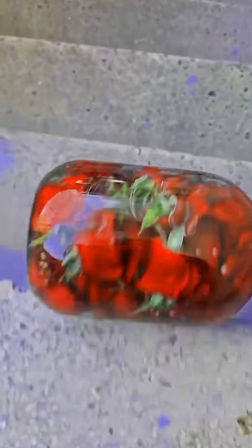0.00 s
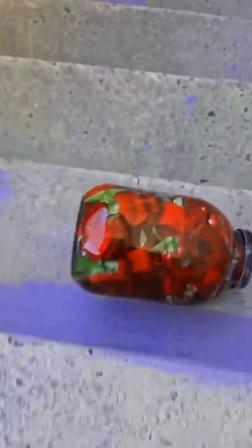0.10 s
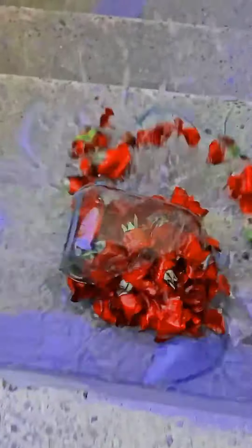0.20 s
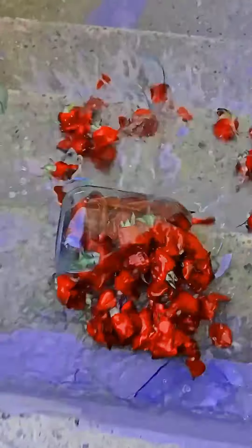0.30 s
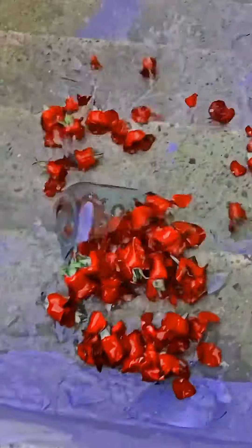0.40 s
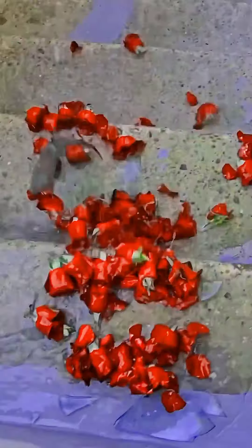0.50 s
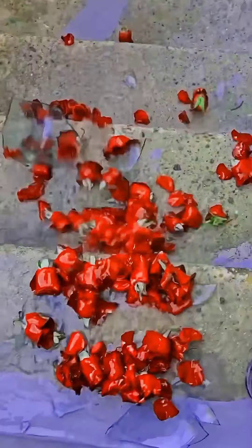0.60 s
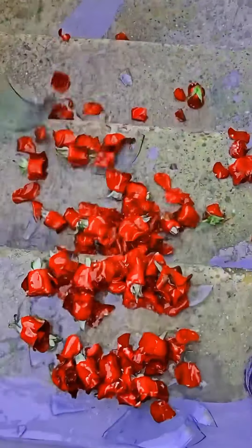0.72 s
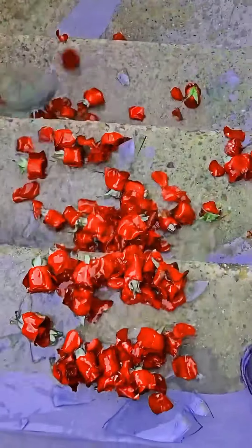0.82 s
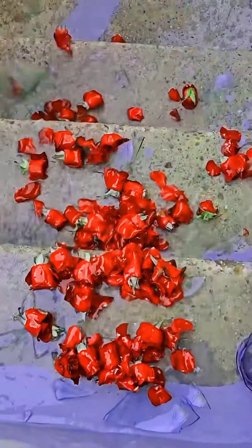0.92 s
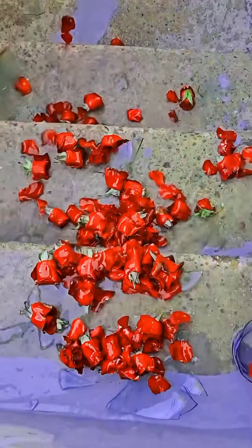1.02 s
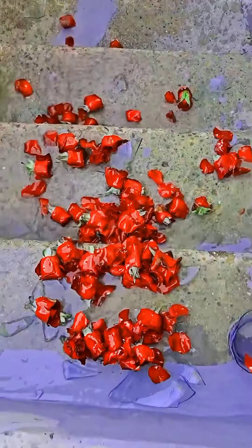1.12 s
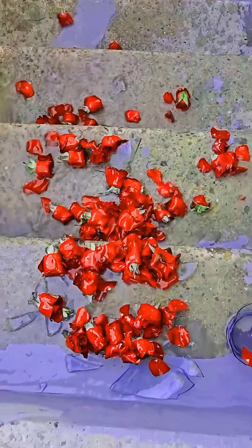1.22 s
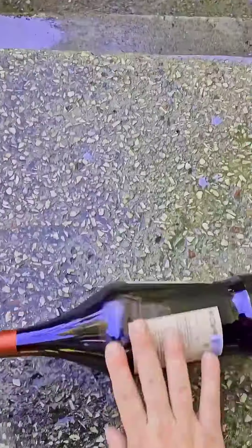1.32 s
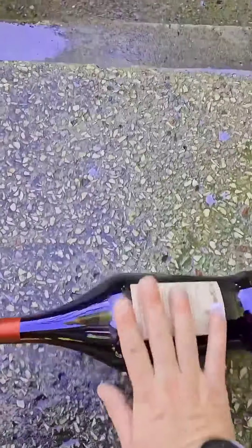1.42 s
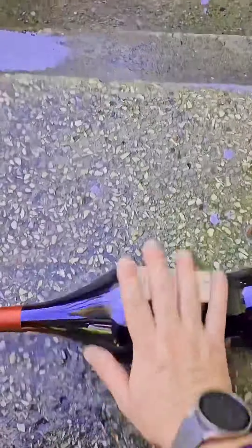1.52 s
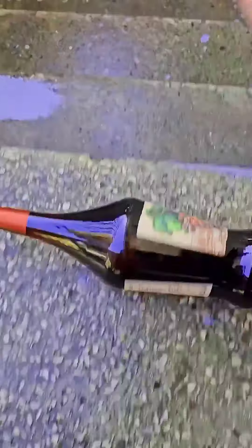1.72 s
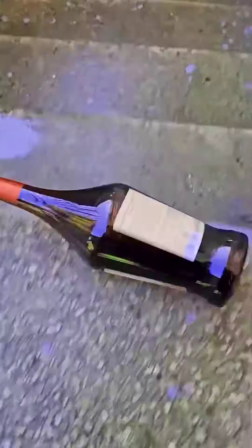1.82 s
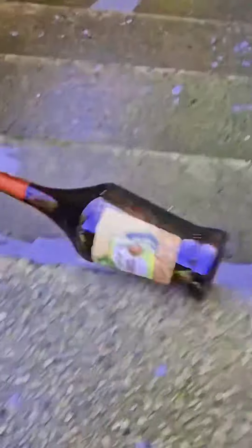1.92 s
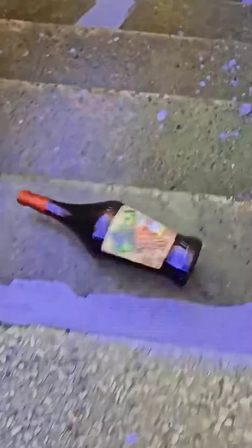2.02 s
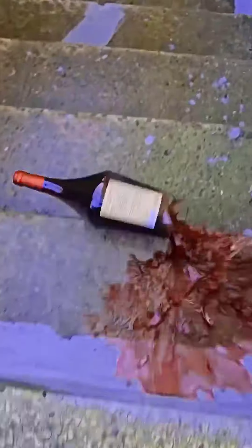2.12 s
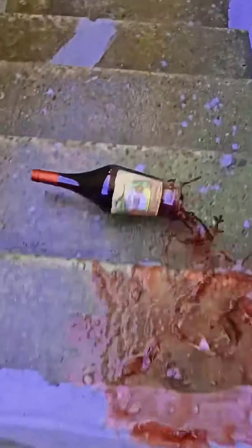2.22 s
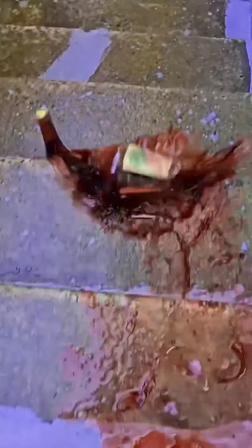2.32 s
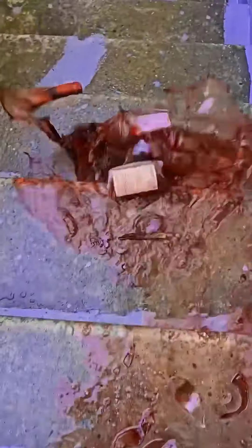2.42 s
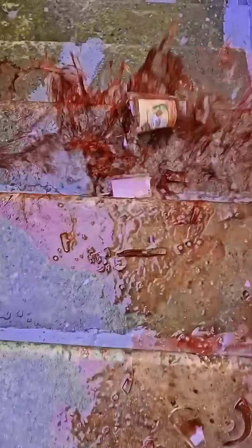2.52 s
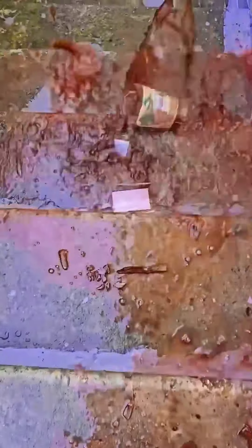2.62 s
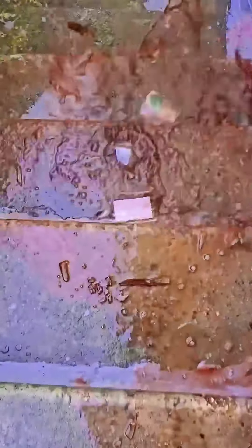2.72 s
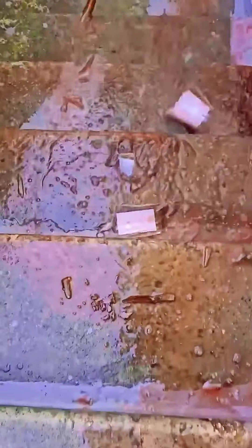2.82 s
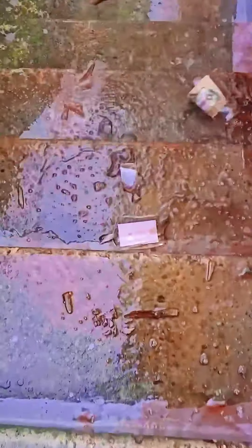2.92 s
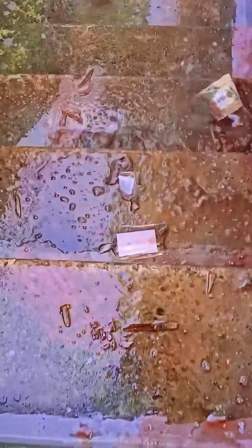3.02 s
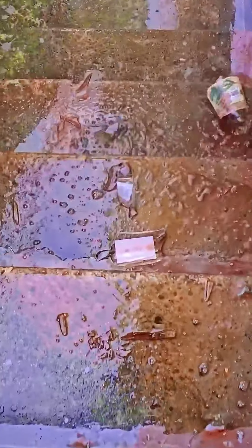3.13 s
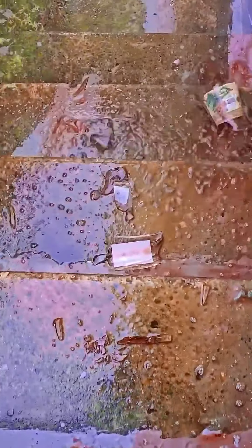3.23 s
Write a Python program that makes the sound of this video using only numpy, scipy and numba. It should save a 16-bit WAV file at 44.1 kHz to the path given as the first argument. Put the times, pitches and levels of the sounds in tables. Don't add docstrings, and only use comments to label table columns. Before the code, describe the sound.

Glass breaks on stone steps. After a brief dull scrape, a jar bursts at 0.2 s with a low thump; bright shards clink, ring and skitter until an abrupt cut at 1.37. A full bottle grinds and knocks rapidly, loudest 1.6-1.9, then smashes around 2.02-2.07. Wine sloshes, a deep blow lands at 2.3, and pieces clink, thinning past 3 s. Close outdoor stereo, short stone echoes, gusty wind rumble.

```python
import sys
import numpy as np
from scipy import signal
from scipy.io import wavfile
from scipy.ndimage import uniform_filter1d
from numba import njit

SR = 44100
rng = np.random.default_rng(int(sys.argv[2]) if len(sys.argv) > 2 else 0)


def master(y):
    cut = np.clip(np.atleast_2d(y).T, -1, 1)
    pcm = np.round(cut * 32767)
    wavfile.write(sys.argv[1], SR, pcm.astype(np.int16))


def volts_from_db(level):
    exponent = np.asarray(level, float) / 20
    return 10 ** exponent


N = 143325
CHANGE_S = 1.371
LAG_S = .00013
LIKENESS = 0.06


@njit
def add(out, at, hz, t60, size, rise, lag, pan):
    for e in range(len(at)):
        turn = np.exp((2j * np.pi * hz[e] - np.log(1000) / t60[e]) / SR)
        rise_step = np.exp(-1 / (rise * SR))
        for c in range(2):
            start = int(at[e] * SR) + int(lag[e] * SR) * c
            z = size[e] * (pan[e] if c == 0 else 1 / pan[e]) + 0j
            unrisen = 1.
            for i in range(start, min(out.shape[1], start + int(t60[e] * SR))):
                out[c, i] += z.imag * (1 - unrisen)
                z, unrisen = z * turn, unrisen * rise_step


def rings(at, db, hz, t60, rise):
    out = np.zeros((2, N))
    place = rng.standard_normal((len(at), 2))
    lag = np.abs(LAG_S * (0.54 + .9 * place[:, 0]))
    pan = volts_from_db(2.0 * place[:, 1])
    add(out, 1. * at, np.minimum(hz, .45 * SR), np.clip(t60, .003, .6), volts_from_db(db), rise, lag, pan)
    return out


def band(x, lo_hz, hi_hz):
    return signal.sosfilt(signal.butter(2, [lo_hz, hi_hz], "band", fs=SR, output="sos"), x)


def unit(x):
    return x / np.sqrt(np.mean(x ** 2))


def walk(rate):
    k = int(SR / rate)
    held = np.repeat(rng.standard_normal(N // k + 1), k)
    return unit(uniform_filter1d(uniform_filter1d(held, k), k)[:N])


def pair(like, grain):
    a, b = rng.standard_normal((2, N)) * grain
    like = np.clip(like, 0, 1)
    right = like * a + np.sqrt(1 - like ** 2) * b
    return np.array([a, np.roll(right, int(LAG_S * SR))])


def curve(table):
    s, db = np.array(table).T
    return volts_from_db(np.interp(np.arange(N) / SR, s, db))


def crashes(table, attack_s, top_db, crack_db, low_hz):
    level_db, crack_s, tail_db, tail_stretch = -5.5, 0.00043, -14.5, 2.88
    power = np.zeros((3, N))
    for s, db, low_db, t60 in table:
        i = int(s * SR)
        t = np.arange(min(N - i, SR // 2)) / SR
        t60 = max(t60, .005)
        fall = 1000. ** (-t / t60)
        crack = volts_from_db(crack_db) * np.exp(-t / crack_s)
        tail = volts_from_db(tail_db) * 1000. ** (-t / t60 / tail_stretch)
        shape = (1 - np.exp(-t / attack_s)) * (fall + crack + tail)
        gain = volts_from_db(db + level_db + np.array([low_db, 0, top_db]))
        power[:, i:i + len(t)] += (gain[:, None] * shape) ** 2
    grain = volts_from_db(1.5 * walk(600))
    out = 0
    for p, lo_hz, hi_hz, like in zip(power, (low_hz, 1600, 6500), (1800, 7000, 16500), (.8, LIKENESS, LIKENESS)):
        out = out + np.sqrt(p) * unit(band(pair(like, grain), lo_hz, hi_hz))
    return out


def shards(table, partner_db, rise):
    s, db, hz, *t60 = np.array(table).T
    t60 = t60[0] if t60 else 0.079 + 0 * s
    c = rng.random((len(s), 2))
    main = rings(s, db, hz, t60, rise)
    beat = rings(s, db - 8, hz * (1 + 0.01 * (c[:, 0] + 0.35)), 0.81 * t60, rise)
    brief = rings(s, db + partner_db, hz * (1.25 + 1.2 * c[:, 0]), 0.2 * t60, rise)
    lasting = rings(s, db + partner_db, hz * (1.2 + 0.75 * c[:, 1]), 1.37 * t60, rise)
    return main + beat + brief + lasting


def debris(table, lo_hz, level_db):
    s, db = np.repeat(np.array(table)[:, :2], 16, axis=0).T
    c = rng.random((len(s), 4))
    piece_db = db + level_db + 5 * c[:, 1] - 3.6 * c[:, 2]
    return rings(s + .04 * c[:, 0] ** 2, piece_db, lo_hz * 8.3 ** c[:, 2], 0.0048 + 0.067 * c[:, 3], 0.00017)


def stone_steps(x):
    t = np.arange(SR // 20) / SR
    echo_t60_s, echo_db, chatter_db = 0.033, -8.5, 3
    echo = rng.standard_normal((2, len(t))) * 1000. ** (-t / echo_t60_s) * (t > .001)
    echo = echo / np.sqrt(np.sum(echo ** 2, axis=1, keepdims=True))
    echo = volts_from_db(echo_db) * band(echo, 1120, 12600)
    x = x * volts_from_db(chatter_db * walk(330))
    return x + signal.fftconvolve(x, echo, axes=1)[:, :N]


# (time [s], peak level [dB], low band relative level [dB], t60 [s])
JAR_CRASHES = [(.05, -25.5, 3, 0.065), (.2165, -5, -5.5, 0.15), (.239, -24, 15.5, 0.057),
               (.307, -15, 1, 0.026), (.349, -13, 3, 0.06), (.372, -26, 1.5, 0.47), (.478, -8, -14, 0.071),
               (.534, -11.5, -3, 0.13), (.593, -11, -6, 0.081), (.692, -28, -27, 0.38),
               (.747, -14.5, -13, 0.065), (.835, -19.5, -13, 0.18), (.958, -14.5, 1, 0.21),
               (1.129, -26, -4.5, 0.42), (1.178, -19.5, -0.5, 0.15)]
# (time [s], peak level [dB], pitch [Hz], t60 [s])
JAR_BODY_MODES = [(.243, -5, 1958, 0.048), (.305, -27, 1310, 0.11), (.44, -16, 1974, 0.036),
                  (.479, -18.5, 2350, .15), (.575, -34, 2005, 0.6), (.594, -4, 3170, .025),
                  (.603, -21, 506, 0.085), (.615, -20.5, 3760, 0.18), (.665, -37, 579, 0.29),
                  (.695, -16.5, 4990, 0.11), (.733, -35, 583, 0.17), (.84, -41, 1040, 0.19),
                  (.85, -34.5, 2240, 0.3), (.87, -32, 2460, 0.26), (.876, -27.5, 500, 0.095),
                  (.9, -24, 392, 0.082), (.965, -31, 1148, 0.24), (.975, -26, 1550, .08),
                  (1.075, -22, 3220, 0.017), (1.09, -25, 5780, .12), (1.131, -28.5, 1153, 0.18),
                  (1.16, -37.5, 307.5, 0.39), (1.255, -39, 608, 0.21), (1.27, -37, 2434, 0.29),
                  (1.36, -16.5, 4500, 0.094)]
# (time [s], peak level [dB], pitch [Hz])
JAR_SHARDS = [(0.3062, -14, 3110), (0.3506, -41, 3950), (0.374, -8, 3240), (0.4774, -5, 4590),
              (0.594, -8.5, 4210), (0.6454, -10.5, 4220), (0.82, -10, 4300), (0.9642, -13, 4770),
              (1.1292, -14, 2590), (1.281, -14, 4380),
              (.3207, -22, 7560), (0.347, -13.5, 9000), (0.4346, -10.5, 7730), (0.557, -12, 7000),
                 (0.5937, -8, 9280), (.617, -16.5, 9770), (0.692, -5, 8130), (.749, -15, 10130),
                 (0.834, -5, 11480), (0.875, -16, 6100), (0.906, -12, 7730), (1.19, -16.5, 7970),
                 (1.2156, -21, 11500), (1.25, -14.5, 8500), (1.2825, -24, 8140)]
# (time [s], peak level [dB], pitch [Hz])
FINAL_CLINK = [
    (1.3605, -11, 9410),
    (1.3605, -15, 8100),
    (1.3605, -15, 14700),
]


def jar():
    burst = crashes(JAR_CRASHES, 0.0059, -11.0, 7, 94)
    pieces = debris(JAR_CRASHES, 2600, -14)
    pieces = pieces + shards(JAR_BODY_MODES, -6.5, 0.007)
    pieces = pieces + shards(JAR_SHARDS, -6.5, .008)
    pieces = pieces + shards(FINAL_CLINK, -8, 0.0022)
    cut = np.clip((CHANGE_S - np.arange(N) / SR) / .002, 0, 1)
    return (burst + stone_steps(pieces)) * cut


# (time [s], peak level [dB], low band relative level [dB], t60 [s])
BOTTLE_CRASHES = [(1.552, -31.5, 3, 0.092), (1.751, -17, -15, 0.057), (1.932, -35, 18.5, 0.041),
                  (2.022, -15, 0, 0.079), (2.064, -9, -4.5, 0.07), (2.134, -14.5, 3, 0.027),
                  (2.272, -13.5, 1, 0.12), (2.37, -29, 1, 0.094), (2.471, -12.5, 0, 0.14),
                  (2.517, -21, -10, 0.051), (2.572, -22, -2.5, 0.19), (2.588, -12, -12.5, 0.087),
                  (2.606, -13, -15, 0.059), (2.778, -18.5, -5, 0.21), (2.828, -22, -10, 0.21),
                  (2.976, -22.5, -15, 0.13), (3.119, -26.5, 1, 0.11)]
# (time [s], peak level [dB], pitch [Hz], t60 [s])
BOTTLE_MODES = [(.535, -6, 584, 0.026), (1.553, -29.5, 2870, 0.15), (1.613, -23.5, 1460, 0.37),
                (1.638, -18, 1437, 0.35), (1.933, -21.5, 1635, 0.06), (1.934, -32.5, 4760, 0.036),
                (2.022, -13, 2632, 0.1), (2.023, -17, 1500, 0.09), (2.783, -21, 3900, .09),
                (2.786, -24, 5750, .1), (2.226, -13, 7640, 0.021), (2.23, -13.5, 1780, 0.0088),
                (2.518, -20.5, 5800, 0.091), (2.607, -19, 7190, 0.12), (1.95, -31, 562, 0.19),
                (2.115, -27, 7870, 0.13), (2.204, -36, 2950, 0.016), (2.375, -42, 6170, .1),
                (2.888, -31, 4390, 0.26), (2.977, -19.5, 3910, 0.17), (2.977, -18.5, 5670, 0.1),
                (3.125, -37.5, 3830, 0.18)]


def bottle():
    burst = crashes(BOTTLE_CRASHES, 0.00079, -6, 6.5, 406)
    pieces = debris(BOTTLE_CRASHES, 1100, -21) + shards(BOTTLE_MODES, -21, 0.00058)
    return burst + stone_steps(pieces)


def knock(hz, t):
    width_s = 0.00055 / (hz / 1000) ** 0.63
    wave = np.cos(2 * np.pi * hz * t) + volts_from_db(-27.0) * np.cos(2 * np.pi * 2900 * t)
    return -wave * np.exp(-(t / width_s) ** 2)


# (time [s], peak level [dB], pitch [Hz])
ROLL_KNOCKS = [(1.574, -19.5, 842), (1.612, -7.5, 1550), (1.626, -20.5, 800), (1.637, -5.5, 1560),
               (1.648, -18.5, 800), (1.659, -27, 800), (1.675, -24, 800), (1.6865, -16.5, 900),
               (1.702, -10, 870), (1.714, -26, 900), (1.727, -8, 820), (1.731, -26, 900),
               (1.7505, -40, 800), (1.757, -28, 735), (1.776, -7.5, 900), (1.786, -32, 1100),
               (1.8017, -15, 1100), (1.819, -10, 1250), (1.8241, -6, 960), (1.851, -15, 1100),
               (1.861, -1.5, 1500), (1.8725, -14.5, 870), (1.883, -33, 1500), (1.895, -18, 1500),
               (2.0207, -3, 1330), (2.064, -11.5, 1160), (2.272, -11.5, 1300), (2.571, -13, 1310)]
# (time [s], level [dB])
ROLL_LEVEL = [
    (1.37, -46),
    (1.4, -38.5),
    (1.55, -33),
    (1.65, -25),
    (1.88, -26.5),
    (1.97, -48),
]


def rolling():
    bumps_per_s, rattle_db = 95, -8.5
    half = 150
    t = np.arange(-half, half) / SR
    out, bumps = np.zeros((2, N)), np.zeros(N)
    for s, db, hz in ROLL_KNOCKS:
        i = int(s * SR) + 60
        out[:, i - half:i + half] += volts_from_db(db + 4) * knock(hz, t - np.array([[0], [LAG_S]]))
    c = rng.standard_normal((int(bumps_per_s * N / SR) - 9, 2))
    bump_s = (np.arange(len(c)) + 4 + .2 * c[:, 0]) / bumps_per_s
    bumps[(bump_s * SR).astype(int)] = volts_from_db(3.5 * c[:, 1])
    rattle = unit(np.convolve(bumps, knock(810, t), "same"))
    rattle = np.array([rattle, np.roll(rattle, int(LAG_S * SR))])
    drive = volts_from_db(rattle_db) * bumps + np.abs(np.roll(out[0], 40)) * 0.12
    grit = signal.lfilter([1], [1, -np.exp(-1 / (0.0055 * SR))], drive) + 0.079
    glass = 0
    for hz, db in ((900, -13.0), (1450, -11.0), (2150, -19), (2900, -12), (5200, -21.5), (7500, -28.5),
                   (12500, -31)):
        glass = glass + volts_from_db(db) * unit(band(pair(0.4, grit), hz / 1.175, hz * 1.105))
    return out + curve(ROLL_LEVEL) * (volts_from_db(rattle_db) * rattle + glass)


# (time [s], level [dB])
SKITTER_LEVEL = [(.183, -58), (.21, -26), (.5, -29), (.9, -30.5), (1.368, -33), (1.372, -52), (2.0, -50.5),
                 (2.04, -28.5), (2.44, -40.5), (2.5, -27.5), (2.74, -37), (2.8, -26.5), (3.0, -42),
                 (3.25, -46.5)]


def skitter():
    splinters_per_s, splinter_t60_s = 1300, 0.084
    c = rng.random((int(splinters_per_s * N / SR), 4))
    db = -1.5 * np.log(c[:, 1] + 1e-3)
    t60 = splinter_t60_s * (.3 + 1.2 * c[:, 3] ** 2)
    tinkle = rings(c[:, 0] * N / SR, db, 3400 * 4.6 ** c[:, 2], t60, .002)
    tinkle = unit(stone_steps(tinkle)) * volts_from_db(-11.5 * (np.arange(N) > CHANGE_S * SR))
    grit = unit(band(pair(0.51, volts_from_db(2.5 * walk(260))), 2550, 7100))
    return curve(SKITTER_LEVEL) * (tinkle + volts_from_db(-6.5) * grit)


# (time [s], peak level [dB], pitch [Hz])
LOW_BLOWS = [
    (0.21, -19.5, 249.6),
    (0.248, -17, 248),
    (0.965, -34.5, 182),
    (1.894, -23, 190),
    (2.271, -20, 238),
    (2.31, -17.5, 105),
    (2.468, -39, 330),
]


def thumps():
    s, db, hz = np.array(LOW_BLOWS).T
    return rings(s, db, hz, 0.12 + 0 * s, 0.0014)


# (time [s], level [dB])
SLOSH_LEVEL = [
    (0, -30.5),
    (.1, -40.5),
    (.16, -71),
    (2.0, -48),
    (2.07, -29),
    (2.16, -57),
    (2.265, -77),
    (2.3, -25.5),
    (2.4, -44.5),
    (2.45, -76),
]


def slosh():
    gulps_per_s = 120
    c = rng.random((int(gulps_per_s * N / SR), 3))
    gulps = rings(c[:, 0] * N / SR, 9 * c[:, 1], 230 * 3.4 ** c[:, 2], 0.018 + 0 * c[:, 0], 0.0015)
    rush = unit(band(pair(0.85, 1.), 187, 790))
    return curve(SLOSH_LEVEL) * (unit(gulps) + volts_from_db(-7.5) * rush)


# (frequency [Hz], level per Hz [dB])
AIR_SPECTRUM = [
    (25, -1),
    (70, -1.5),
    (130, -3),
    (300, -18.5),
    (900, -24),
    (2400, -31),
    (16000, -61.5),
]
# (time [s], level [dB])
WIND_LEVEL = [
    (0, -35),
    (.3, -37),
    (1.3, -42),
    (1.9, -31),
    (2.5, -37.5),
    (3.25, -42.5),
]


def air():
    out = 0
    table_hz, table_db = np.array(AIR_SPECTRUM).T
    for hz in 35 * 2 ** np.arange(0, 9, .75):
        density_db = np.interp(np.log(hz), np.log(table_hz), table_db)
        db = density_db + 10 * np.log10(hz) + 4 * walk(6.6)
        noise = pair(np.clip(1 - hz / 3000, .3, .93), 1.)
        out = out + volts_from_db(db) * unit(band(noise, hz / 1.3, min(hz * 1.3, 17000)))
    return curve(WIND_LEVEL) * unit(out)


def scene():
    return jar() + bottle() + rolling() + skitter() + thumps() + slosh() + air()


def roll_off(x):
    return signal.sosfilt(signal.butter(12, 16970, fs=SR, output="sos"), x)


def record(dry):
    left_db, left_top_db, top_hz = 1.0, 5, 16200
    side = np.array([[.5], [-.5]])
    top = signal.sosfilt(signal.butter(1, 6000, "high", fs=SR, output="sos"), dry)
    x = (dry + (volts_from_db(left_top_db * side) - 1) * top) * volts_from_db(left_db * side)
    low_pass = signal.ellip(8, .3, 60, top_hz, fs=SR, output="sos")
    return roll_off(signal.sosfilt(low_pass, np.tanh(x)))


dry = scene()
out = record(dry)
master(out)
```